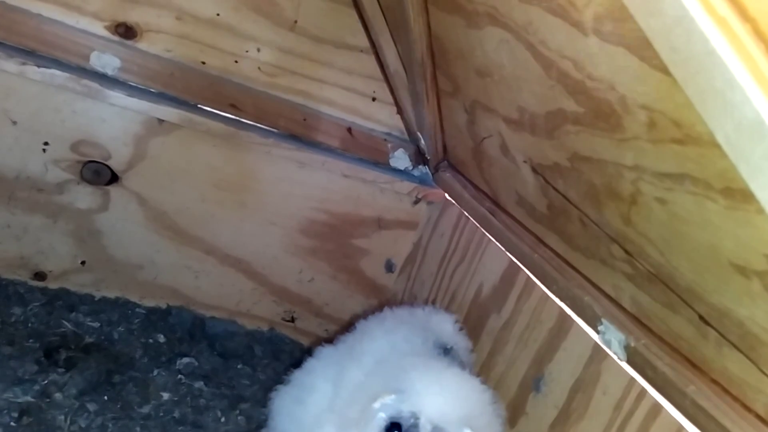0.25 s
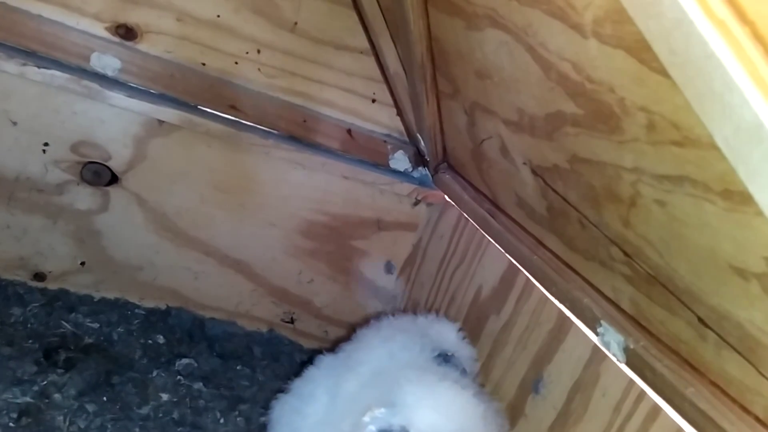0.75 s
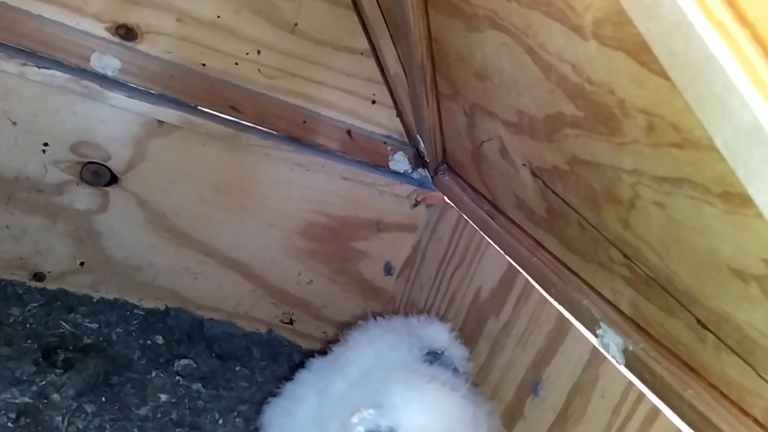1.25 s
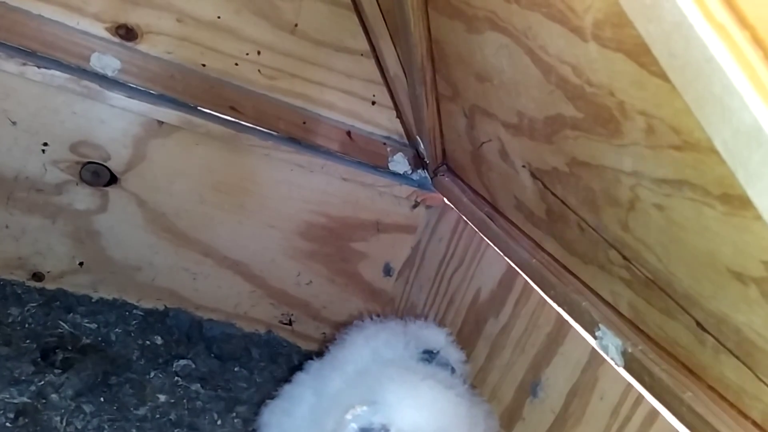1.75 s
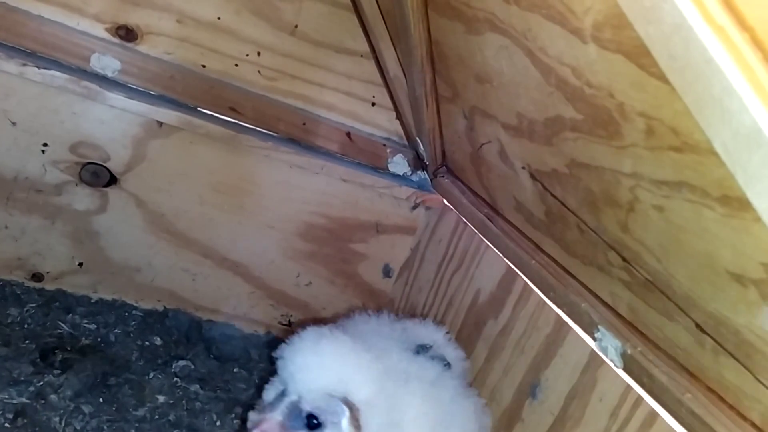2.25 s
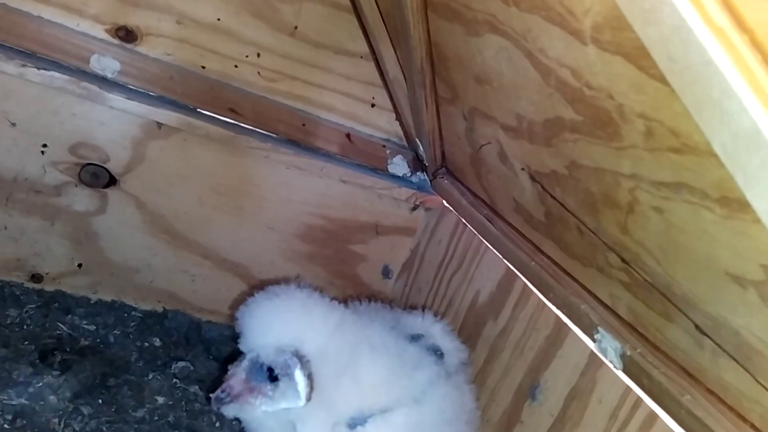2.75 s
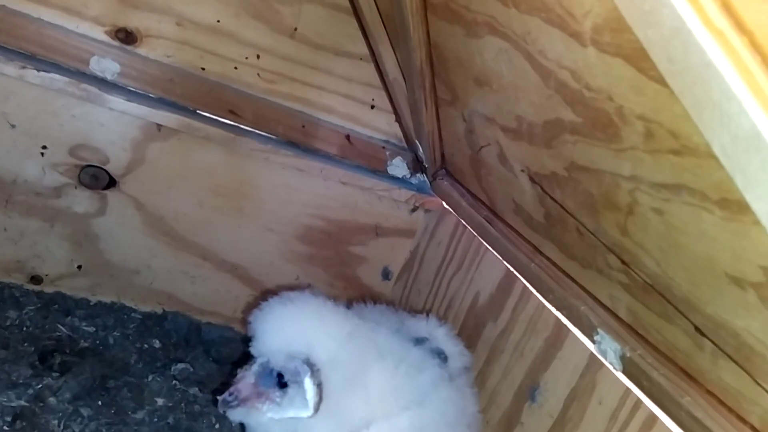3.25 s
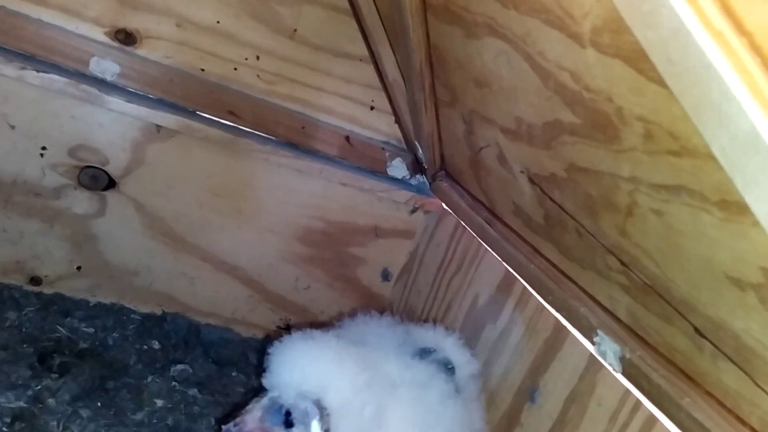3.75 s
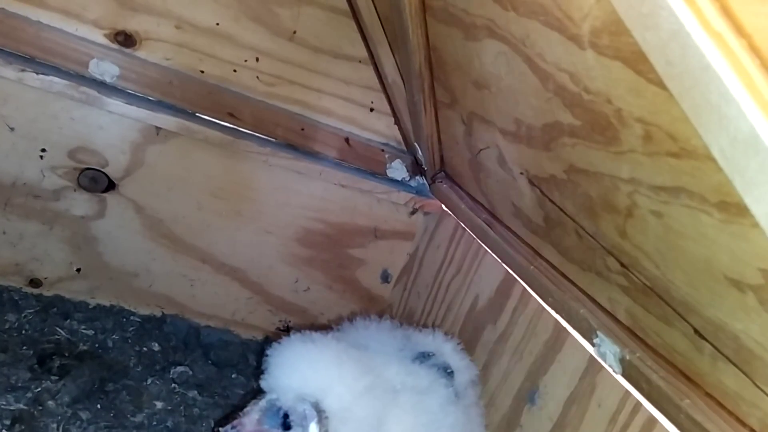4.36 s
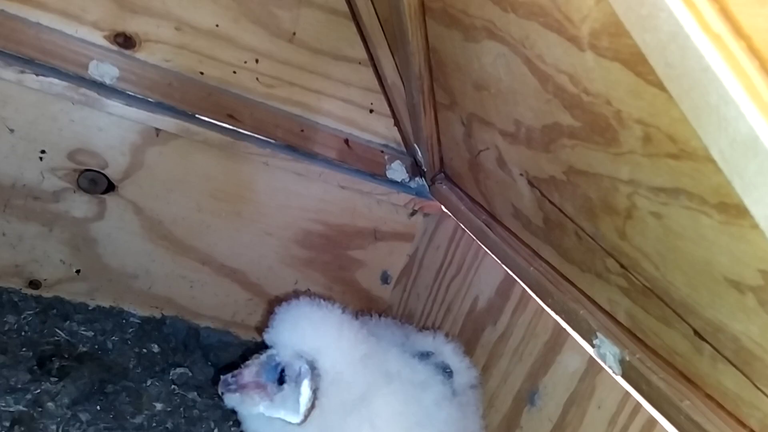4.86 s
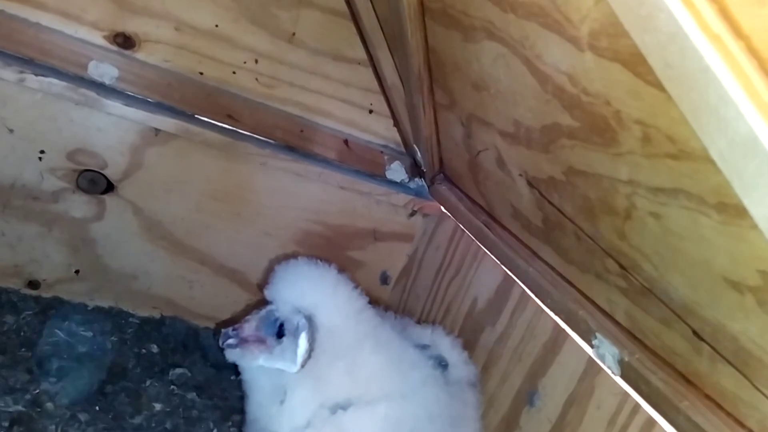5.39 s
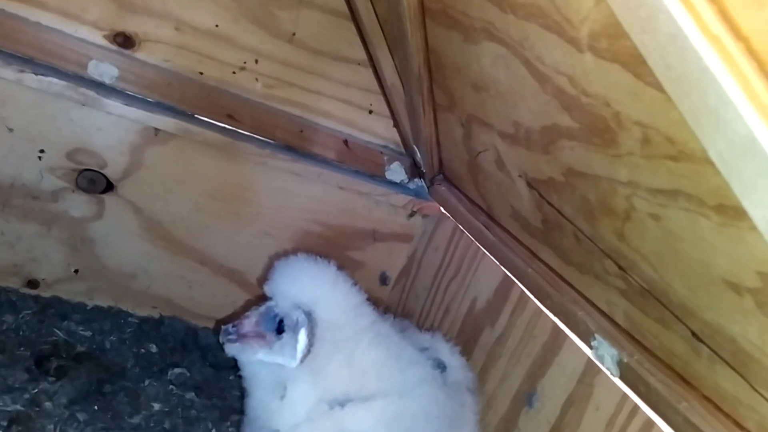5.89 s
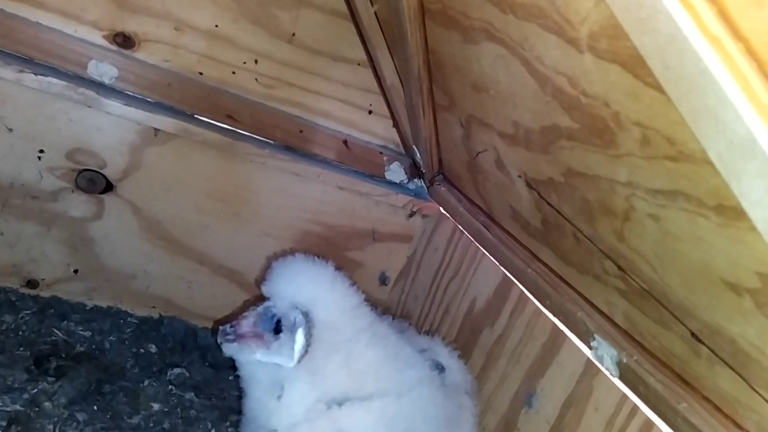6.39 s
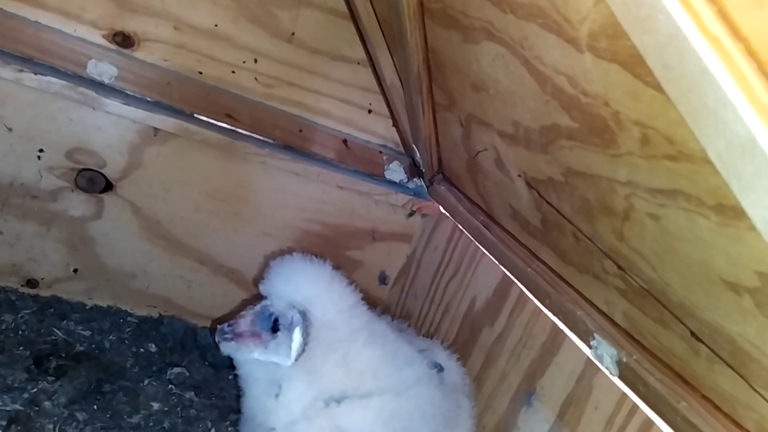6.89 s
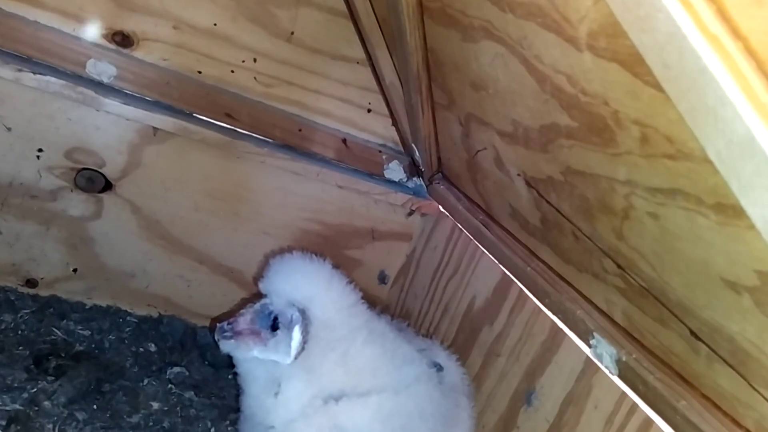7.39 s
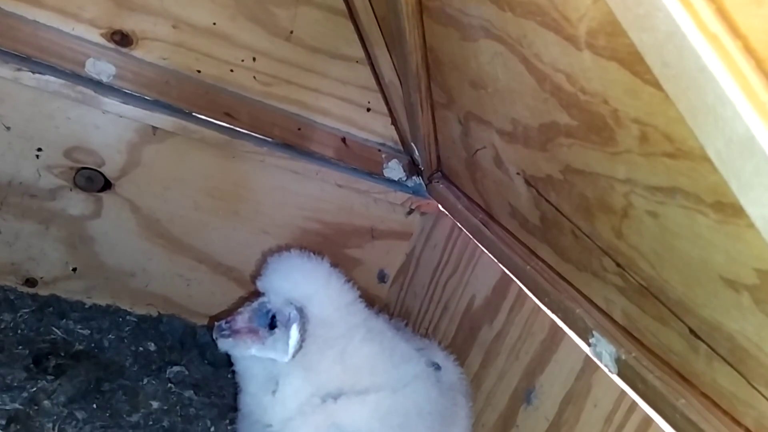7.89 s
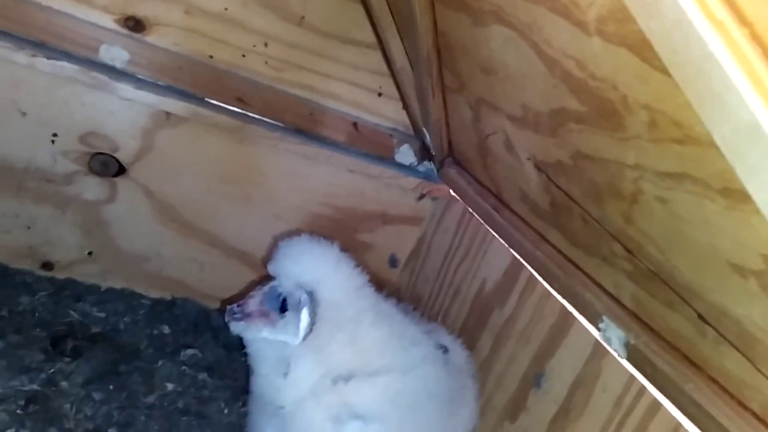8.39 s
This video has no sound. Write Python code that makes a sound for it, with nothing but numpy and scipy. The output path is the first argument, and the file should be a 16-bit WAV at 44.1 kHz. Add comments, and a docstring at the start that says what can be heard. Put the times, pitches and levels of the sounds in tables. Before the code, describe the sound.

Inside a plywood nest box, a downy barn owl chick shuffles and knocks the boards, then gives four quick rasping hisses with brief falling squeals. A hard thump follows, then four more hisses, another knock and two isolated hisses. Outside, paired pips, thin whistles and distant hoarse wails sound over low hum and a passing engine. The microphone is close, in a small resonant box.

```python
"""Rasping bird hisses, two runs of four and then two single ones: streaky breath with short falling squeals.
A barn owl chick shifts about in a plywood nest box: rubbing and sharp knocks set the boards ringing.
Outside, one bird wails in two hoarse tones, another pips in pairs and a third whistles thinly.
Behind them lie filtered noise for a low hum and air, a wavering engine tone and spells of a low drone.
"""
import sys
import numpy as np
from scipy import signal
from scipy.fft import rfft, irfft, next_fast_len
from scipy.io import wavfile
from scipy.ndimage import uniform_filter1d, minimum_filter1d

SR = 44100
rng = np.random.default_rng(int(sys.argv[2]) if len(sys.argv) > 2 else 0)


def generate_wav(sig):
    """Save sig (samples, or channels by samples) to the path in sys.argv[1] as 16-bit PCM at SR."""
    pcm = np.round(np.clip(np.atleast_2d(sig).T, -1, 1) * 32767).astype(np.int16)
    wavfile.write(sys.argv[1], SR, pcm)


N = 381024
T = np.arange(N) / SR


def amp(db):
    """Turns decibels into a plain multiplier."""
    return 10 ** (np.asarray(db) / 20)


def evened(x):
    """Scales a sound to rms 1."""
    return x / np.sqrt(np.mean(x ** 2) + 1e-20)


def noise(size):
    """Plain white noise."""
    return rng.standard_normal(size)


def follow(rows, t):
    """The columns of a curve, read at the times t."""
    s, *columns = np.transpose(rows)
    return [np.interp(t, s, column) for column in columns]


def add(mix, s, sound):
    """Lays a sound into the mix, starting at s seconds."""
    part = mix[max(round(s * SR), 0):][:len(sound)]
    part += sound[:len(part)]


def gate(t, length, attack, release):
    """Rises from silence, holds at 1 and falls back to silence at the end of its length."""
    return np.clip(t / attack, 0, 1) * np.clip((length - t) / release, 0, 1)


def peak_db(t, rise_db_per_s, fall_db_per_s):
    """A level that climbs to 0 dB at t = 0 and then falls."""
    return np.minimum(rise_db_per_s * t, -fall_db_per_s * t)


def coloured(points, size):
    """Noise of rms 1 with a given spectrum."""
    hz, db = np.transpose(points)
    log_hz = np.log(np.fft.rfftfreq(size, 1 / SR) + 1)
    gain = amp(np.interp(log_hz, np.log(hz), db))
    return evened(irfft(rfft(noise(size)) * gain, size))


def wander(rate_hz, size):
    """Smooth chance of about rms 1, with little movement faster than the given rate."""
    full = next_fast_len(size + SR // 2)
    gain = np.exp(-(np.fft.rfftfreq(full, 1 / SR) / rate_hz) ** 2)
    return evened(irfft(rfft(noise(full)) * gain, full))[:size]


def turning(hz):
    """The running phase of a tone whose pitch follows a curve."""
    return 2 * np.pi * np.cumsum(hz) / SR


def resonate(x, hz, width):
    """A steep resonance, three equal poles of the given width, that can follow a curve; rms 1."""
    turn = np.exp(1j * turning(hz * np.ones(len(x))))
    r = np.exp(-np.pi * width / SR)
    # turn the pitch down to zero, smooth there, and turn it back up
    smoothed = signal.lfilter([1], np.poly([r, r, r]), x / turn)
    return evened((turn * smoothed).real)


def glide(length, start_hz, end_hz, waver, hoarse=0):
    """A whistle that swells and fades as its pitch slides, from clean to hoarse; rms 1 at the top."""
    size, hoarse = int(length * SR), np.clip(hoarse, 0, 1)
    hz = np.geomspace(start_hz, end_hz, size) * (1 + waver * wander(300, size))
    clean = evened(np.sin(turning(hz)))
    fuzz = resonate(noise(size), hz, 450)
    return evened((1 - hoarse) * clean + hoarse * fuzz) * np.hanning(size)


def echoes(x, t60, low_hz, high_hz):
    """A diffuse tail of energy 1 within a band."""
    t = T[:SR // 2]
    band = signal.butter(2, [low_hz, min(high_hz, SR / 2.2)], "band", fs=SR, output="sos")
    tail = signal.sosfilt(band, noise(len(t))) * amp(-60 * t / t60) * (1 - np.exp(-t / 0.0043))
    return signal.oaconvolve(x, tail / np.linalg.norm(tail))[:N]


# resonances of the low hum: f/Hz, width/Hz, level/dB
HUM = [(65.6, 30, -47), (86.3, 16.8, -32), (124.64, 14.6, -34), (116, 106, -34), (189.6, 46, -46)]
# slow rise and fall of the hum: t/s, level/dB
HUM_LEVEL = [(0, -2.5), (1.1, 1.5), (2.7, 1.5), (3.8, -1), (4.7, 1.5), (6.3, 3), (6.8, 1.5), (8.3, 3.5),
             (8.64, -0.5)]


def low_hum():
    """Noise gathered by a few low resonances, with its level drifting."""
    hum = sum(amp(db) * resonate(noise(N), hz, width) for hz, width, db in HUM)
    hum = signal.sosfilt(signal.butter(6, 50, "high", fs=SR, output="sos"), hum)
    return amp(follow(HUM_LEVEL, T)[0] + 1.1 * wander(6.9, N)) * hum


# colour of the outdoor air: f/Hz, relative level/dB (per Hz)
AIR = [(120, -31), (200, -1.5), (313, -1.5), (539, -5), (629, -5.5), (735, -4.5), (2070, -17.5),
       (3400, -14), (4100, -18), (4500, -17.5), (5250, -21.5), (6800, -28.5), (7700, -41), (10500, -81.5),
       (17800, -120)]
# level of the outdoor air: t/s, level/dB
AIR_LEVEL = [(0, -51), (.5, -51), (3.3, -51), (5.8, -47), (6.7, -50.5), (8.3, -47.5), (8.64, -51)]


def outdoor_air():
    """Coloured noise that flickers slightly in level."""
    air = coloured(AIR, N) * amp(1.4 * wander(34, N))
    return amp(follow(AIR_LEVEL, T)[0]) * air


ENGINE_NEAREST_S, ENGINE_DB, ENGINE_RISE_DB_PER_S, ENGINE_FALL_DB_PER_S = 2.045, -23.5, 7, 10.5
ENGINE_START_HZ, ENGINE_CLIMB_HZ_PER_S = 145.1, 2.5


def distant_engine():
    """A wavering tone comes nearer and goes away, slowly gaining speed and so climbing in pitch."""
    db = ENGINE_DB + peak_db(T - ENGINE_NEAREST_S, ENGINE_RISE_DB_PER_S, ENGINE_FALL_DB_PER_S)
    hz = ENGINE_START_HZ + ENGINE_CLIMB_HZ_PER_S * T
    tone = evened(np.sin(turning(hz * (1 + 0.013 * wander(12, N)))))
    return amp(db + 2 * wander(21, N)) * tone


# spells of the drone: start t/s, length/s, level/dB at the start
DRONES = [(0.071, 0.37, -37), (0.8, 0.56, -39.5), (1.41, 1.6, -43.5), (5.297, 0.93, -28)]
DRONE_ATTACK_S, DRONE_RELEASE_S, DRONE_SAG_DB_PER_S = 0.049, 0.077, 6
DRONE_TONE_HZ, DRONE_TONE_DB = 253.7, -7.5  # one steady tone; its level is against the noise


def low_drone():
    """Two bands of noise and one steady tone come and go, each spell slowly sagging in level."""
    drone = evened(resonate(noise(N), 245.6, 76) + 0.66 * resonate(noise(N), 311, 85))
    tone = evened(np.sin(2 * np.pi * DRONE_TONE_HZ * T))
    drone = evened(drone + amp(DRONE_TONE_DB) * tone)
    spells = np.zeros(N)
    for s, length, db in DRONES:
        level = amp(db - DRONE_SAG_DB_PER_S * (T - s))
        spells += level * gate(T - s, length, DRONE_ATTACK_S, DRONE_RELEASE_S)
    return spells * drone


def background():
    """Hum, air, engine and drone together."""
    return low_hum() + outdoor_air() + distant_engine() + low_drone()


# the thin whistles: start t/s, length/s, start f/Hz, end f/Hz, level/dB, hoarseness (0-1)
WHISTLES = [(0.345, 0.073, 5200, 5050, -61, .6), (1.386, 0.033, 1670, 1800, -48.5, 0.04),
            (7.996, 0.068, 5090, 5000, -58, 0.75), (0.432, 0.061, 4540, 4800, -50, 0.2),
            (0.478, 0.04, 3070, 3580, -39, 0.4), (1.561, 0.13, 5180, 4760, -50.5, 0.5),
            (2.988, 0.22, 4800, 5240, -57, 1), (3.244, 0.14, 5500, 5430, -58, 0.6),
            (3.322, 0.16, 5080, 4970, -54, 0.4), (3.333, 0.083, 4780, 4570, -46.5, 0.4),
            (5.043, 0.16, 7730, 7730, -55, 0.16), (5.335, 0.12, 5070, 4920, -45, 0.8),
            (5.343, 0.17, 4500, 4200, -43.5, .9), (5.755, 0.26, 7130, 7820, -54.5, 0.4),
            (6.188, 0.14, 7000, 6870, -57, 0.7), (6.95, 0.043, 2870, 4000, -40.5, 0.4),
            (6.977, 0.054, 3600, 3800, -44.5, 1), (7.518, 0.11, 6800, 7320, -52.5, 0.65),
            (7.736, 0.11, 5200, 5030, -50.5, .7), (7.794, 0.061, 4220, 3790, -38.5, 0.37),
            (8.311, 0.18, 4700, 4310, -38.5, 0.8), (8.36, 0.092, 4930, 3220, -37, 0.4)]


def whistles():
    """Thin gliding tones, some clean and some breathy."""
    out = np.zeros(N)
    for s, length, start_hz, end_hz, db, hoarse in WHISTLES:
        add(out, s, amp(db) * glide(length, start_hz, end_hz, waver=0.0081, hoarse=hoarse))
    return out


# pairs of falling pips: middle of the second pip t/s, level/dB
PIP_PAIRS = [(0.127, -37.5), (0.357, -35), (0.663, -34.5), (0.805, -36.5), (1.028, -33), (1.283, -36),
             (1.5, -37), (1.659, -33.5), (3.543, -40), (3.72, -39), (3.916, -38), (5.855, -43),
             (6.041, -36.5), (6.243, -35), (6.457, -35.5), (7.625, -42.5), (7.979, -34), (8.197, -37.5),
             (8.478, -38)]
# a faint lead-in note, a softer pip and the full pip: t/s from the second pip, level/dB against the pair
PIP_RUN = [(-.08, -25), (-.042, -5.5), (0, 1)]
PIP_ECHO_S, PIP_ECHO_DB = .026, -17
PIP_LENGTH_S, PIP_START_HZ, PIP_END_HZ = .028, 4306, 3924  # each pip strays a little from these


def pips():
    """Short falling whistles in pairs, each with one quick echo."""
    out = np.zeros(N)
    for second, db in PIP_PAIRS:
        for offset, pip_db in PIP_RUN:
            stretch, detune, slip, size_db = rng.standard_normal(4)
            length = PIP_LENGTH_S * 2 ** (.2 * stretch)
            pitch = 1 + .008 * detune
            end_hz = pitch * PIP_END_HZ * (1 + .018 * slip)
            pip = glide(length, pitch * PIP_START_HZ, end_hz, waver=0.0047, hoarse=0.098)
            pip = amp(db + pip_db + size_db) * pip
            onset = second + offset - length / 2
            add(out, onset, pip)
            add(out, onset + PIP_ECHO_S, amp(PIP_ECHO_DB) * pip)
    return out


def songbirds():
    """Paired pips and thin whistles, with a diffuse echo from the trees."""
    out = pips() + whistles()
    return out + amp(-19) * echoes(out, 0.39, 3000, 6800)


# hoarseness of a wail: width of the noise around each tone, and its strength on the lower and upper one
WAIL_FUZZ_HZ, WAIL_LOW_FUZZ, WAIL_HIGH_FUZZ = 230, .52, .75


def hoarse_tone(hz, fuzz):
    """A nearly steady tone wrapped in a narrow band of breath; rms 1."""
    tone = evened(np.sin(turning(hz * (1 + .007 * wander(250, len(hz))))))
    return evened(tone + fuzz * resonate(noise(len(hz)), hz, WAIL_FUZZ_HZ))


# distant wails: start t/s, length/s, level/dB
WAILS = [(3.278, 0.41, -33.5), (3.886, 0.51, -36.5), (4.491, 0.53, -36), (5.125, 0.45, -34),
         (5.747, 0.43, -33)]
# overtones, strongest while a wail is at its top: f/Hz, width/Hz, level/dB against the lower tone
WAIL_OVERTONES = [(2926, 110, -12.5), (3420, 86, -10.5)]
# a wail scoops up to its top and sinks back; attack and release are shares of its length
WAIL_TOP_S, WAIL_SCOOP_S, WAIL_SINK_S, WAIL_ATTACK, WAIL_RELEASE = .062, 0.055, 0.1, 0.048, 0.23
# resting pitch of each tone, and its usual lift at the top
WAIL_LOW_HZ, WAIL_LOW_LIFT_HZ, WAIL_HIGH_HZ, WAIL_HIGH_LIFT_HZ = 1354, 345, 2030, 210
WAIL_START_DB, WAIL_FULL = -12, 0.43  # it starts soft and is full at this share of its length
# how long overtones and upper tone last on each side of the top, and the level of that tone there
WAIL_OVERTONE_S, WAIL_HIGH_S, WAIL_HIGH_DB = .04, 0.096, -4
WAIL_THROB_HZ, WAIL_THROB = 62, .85  # average rate, and depth before the top weakens it


def wail(length, db):
    """A cry of two tones, with brief overtones at its top; its throb deepens as it sinks."""
    size = int(length * SR)
    share, t = np.linspace(0, 1, size), T[:size] - WAIL_TOP_S
    arch = np.exp(-(abs(t) / np.where(t < 0, WAIL_SCOOP_S, WAIL_SINK_S)) ** 1.7)
    arch = arch * (1 + .08 * rng.standard_normal()) + .035 * wander(20, size)
    low_hz = WAIL_LOW_HZ + WAIL_LOW_LIFT_HZ * arch
    high_hz = WAIL_HIGH_HZ + WAIL_HIGH_LIFT_HZ * arch
    soft_start = amp(WAIL_START_DB * np.maximum(1 - share / WAIL_FULL, 0))
    swell = gate(share, 0.88, WAIL_ATTACK, WAIL_RELEASE) * soft_start
    beat = turning(WAIL_THROB_HZ * (1 + .12 * wander(40, size)))
    throb = WAIL_THROB * (1 - arch / 2)
    # the throb sways the lower pitch as well as the loudness
    low = hoarse_tone(low_hz + throb * WAIL_THROB_HZ * np.cos(beat), WAIL_LOW_FUZZ)
    high_level = amp(WAIL_HIGH_DB) * np.exp(-(t / WAIL_HIGH_S) ** 2) + amp(-24.5)
    high = hoarse_tone(high_hz, WAIL_HIGH_FUZZ) * high_level
    overtones = sum(amp(over_db) * resonate(noise(size), hz, width) for hz, width, over_db in WAIL_OVERTONES)
    cry = low + high + np.exp(-(t / WAIL_OVERTONE_S) ** 2) * overtones
    return amp(db) * swell * evened((1 + throb * np.sin(beat) / 2) * cry)


def wails():
    """Every distant wail, with a faint diffuse echo."""
    out = np.zeros(N)
    for s, length, db in WAILS:
        add(out, s, wail(length, db))
    return out + amp(-12) * echoes(out, .2, 900, 4000)


# ways the box likes to ring (its modes): f/Hz, relative level/dB, t60/s (time to fall by 60 dB)
BOARDS = [(204.8, 4, 0.5), (240, -10.5, 1), (296, -3.5, 0.41), (368.5, 1.5, .25), (404.3, 0.5, 0.23),
          (490.6, 3.5, 0.16), (587, -6.5, 0.28), (658, -2, 0.24), (719, -3, 0.15), (795, 0, 0.16),
          (852.4, 3.5, 0.17), (904, -6, 0.27), (958, -1, 0.13), (1033, -4.5, 0.22), (1107, -8.5, .12),
          (1195, -9, 0.19), (1257, -12, 0.13)]
# the chick shuffles on the boards: start t/s, length/s, level/dB
SHUFFLES = [(0.12, 0.044, -53), (0.258, 0.07, -42.5), (0.336, 0.046, -45), (0.441, 0.088, -44.5),
            (0.615, 0.16, -36), (0.801, 0.18, -44.5), (1.015, 0.4, -50), (1.26, 0.063, -48.5),
            (3.414, 0.095, -44)]
RUB_HZ, RUB_FOCUS_DB = 684, 8.5  # the pitch that rubbing favours, and the loss an octave away


def shuffles():
    """Soft rubbing stirs the modes of the box, heard as narrow bands of noise."""
    out = np.zeros(N)
    for s, length, db in SHUFFLES:
        size = int(length * SR)
        rub = np.zeros(size)
        for hz, mode_db, _ in BOARDS:
            weight = amp(mode_db - RUB_FOCUS_DB * np.log2(hz / RUB_HZ) ** 2)
            rub += weight * resonate(noise(size), hz, 110)
        add(out, s, amp(db + 3.7 * wander(55, size)) * evened(rub) * np.hanning(size))
    return out


STRIKE_SPREAD_DB = 2  # each blow lands on another spot and so weights the modes differently


def board_ring(t, favoured_hz, focus_db):
    """The modes of the box die away together, strongest near the pitch the blow favours."""
    hz, db, t60 = np.transpose(BOARDS)[:, :, None]
    spread_db = STRIKE_SPREAD_DB * rng.standard_normal(hz.shape)
    weight = amp(db - focus_db * np.log2(hz / favoured_hz) ** 2 + spread_db)
    phase = 2 * np.pi * rng.random(hz.shape)
    hz = hz * (1 + .008 * rng.standard_normal(hz.shape))
    modes = weight * amp(-60 * t / t60) * np.sin(2 * np.pi * hz * t + phase)
    ring = modes.sum(0) / np.linalg.norm(weight)
    # countless weaker modes fill in between the strong ones
    wash = resonate(noise(len(t)), favoured_hz, 1.5 * favoured_hz)
    boards = np.sqrt(2) * ring + wash * (amp(-8 - 60 * t / .11) + amp(-22 - 60 * t / .5))
    return boards * (1 - np.exp(-t / .0012))  # the boards take a moment to answer


# colour of the crack: f/Hz, relative level/dB
CRACK = [(300, -13), (900, -2), (1300, -10.5), (2700, -6.5), (3400, -13), (4000, -16), (6000, -21.5),
         (8000, -44.5)]


def wood_crack(t, crack_hz, top_hz, t60, rise):
    """A short tick, a snap of noise around it and a broader crack, with the treble cut off."""
    tick = amp(5) * np.sin(2 * np.pi * crack_hz * t) * amp(-60 * t / 0.015)
    snap = tick + amp(-8.5) * resonate(noise(len(t)), crack_hz, 1300) * amp(-60 * t / t60)
    hardness = (0.0012 / max(rise, .001)) ** .5  # a slow contact makes less of the broad crack
    fading = amp(-5.5 - 60 * t / t60) + amp(-19 - 60 * t / 0.15) + amp(-28.5 - 60 * t / 0.45)
    crack = snap + hardness * coloured(CRACK, len(t)) * fading
    return signal.sosfilt(signal.butter(3, min(top_hz, SR / 2.2), fs=SR, output="sos"), crack)


def floor_thump(t, thump_hz):
    """The floor shakes with a low tone and a band of low noise."""
    floor = np.sin(2 * np.pi * thump_hz * t) + 0.44 * resonate(noise(len(t)), 150, 220)
    return floor * amp(-60 * t / 0.38) * (1 - np.exp(-t / 0.004))


def knock(board_db, favoured_hz, focus_db, crack_db, crack_hz, top_hz, crack_t60, thump_db, thump_hz, rise):
    """A blow cracks, rings the boards and shakes the floor, all softened by how slowly it makes contact."""
    t = T[:SR // 2]
    boards = amp(board_db) * board_ring(t, favoured_hz, focus_db)
    crack = amp(crack_db) * wood_crack(t, crack_hz, top_hz, crack_t60, rise)
    thump = 2 * amp(thump_db) * floor_thump(t, thump_hz)
    contact = 1 - np.exp(-(t / rise) ** 2)
    return contact * (boards + crack + thump)


# knocks on the box: t/s, board level/dB, favoured f/Hz, loss an octave from it/dB, crack level/dB,
# crack centre f/Hz, crack top f/Hz, crack t60/s, thump relative level/dB, thump f/Hz, rise/s
KNOCKS = [(0.503, -21, 660, 15, -13, 2920, 3700, 0.066, -50, 73, 0.003),
          (0.5074, -10, 700, 6, -5.5, 2614, 3800, 0.019, -49, 72.5, 0.00034),
          (0.574, -21, 596, 8, -27, 2700, 6000, 0.072, -39, 87.5, 0.003),
          (.593, -9.5, 806, 18, -18, 1730, 6900, 0.028, -19.5, 85, 0.0003),
          (0.5983, -14.5, 688, 26, -17, 2630, 6500, 0.036, -35, 90, 0.00067),
          (.621, -32, 800, 8, -44, 1980, 4000, 0.042, -37, 87.6, .002),
          (1.389, -27, 500, 33, -54, 1730, 1980, 0.056, -29, 75, 0.005),
          (1.401, -14.5, 348, 47.5, -55, 1730, 1980, 0.056, -12.5, 75.3, 0.0028),
          (1.453, -32, 480, 19, -61, 1700, 2000, .05, -26.5, 72, 0.011),
          (1.6989, -6.5, 593, 7.5, -8.5, 1710, 6800, 0.047, -40, 72, 0.001),
          (1.715, -11, 800, 12, -24, 1900, 6000, 0.031, -48, 72, 0.0013),
          (2.263, -44.5, 780, 30, -26, 1720, 6600, 0.22, -54, 72, 0.0025),
          (3.0102, -5, 463, 62, -20, 3000, 3700, 0.2, -16.5, 92.8, 0.0019),
          (3.02, -16, 770, 31, -30, 1490, 3680, .1, -27, 70, 0.0023),
          (3.082, -29, 600, 9, -50.5, 2200, 3500, 0.13, -28, 84, 0.0035),
          (6.055, -8.5, 740, 9.5, -7, 1850, 5500, 0.038, -48.5, 71.8, 0.00033),
          (6.078, -15.5, 736, 26, -33.5, 1490, 2980, 0.049, -51, 72.3, .002),
          (8.383, -30, 660, 14, -36.5, 1700, 2520, 0.13, -66, 72, 0.0077)]


def knocks():
    """Every blow on the same box."""
    out = np.zeros(N)
    for s, *blow in KNOCKS:
        add(out, s, knock(*blow))
    return out


# bands of the echo that lingers after a hiss: f/Hz, width/Hz, relative level/dB
AFTERRING = [(3275, 170, 2), (3720, 880, 1.5)]
AFTERRING_DELAY_S, AFTERRING_LENGTH_S, AFTERRING_FADE_DB_PER_S = 0.08, 0.18, 24


def afterring(db):
    """A thin fading echo of the squeal, two bands of noise, lingers after a hiss."""
    t = T[:int(AFTERRING_LENGTH_S * SR)]
    bands = sum(amp(band_db) * resonate(noise(len(t)), hz, width) for hz, width, band_db in AFTERRING)
    fade = amp(db - AFTERRING_FADE_DB_PER_S * t)
    return fade * gate(t, AFTERRING_LENGTH_S, 0.021, 0.061) * evened(bands)


def streaks(hz, size, per_s, octaves):
    """The voice slips down in pitch and jumps back, unevenly, many times a second; rms 1."""
    cycle = np.cumsum(per_s * (1 + 0.33 * wander(70, size))) / SR + rng.random()
    slip = cycle % 1
    pitch = hz * 2 ** (octaves * (.5 - slip)) * (1 + 0.0353 * wander(587, size))
    return evened(np.sin(turning(pitch)) * np.sin(np.pi * slip) * amp(3.5 * wander(110, size)))


# upper throat resonances: f/Hz, width/Hz, level/dB, t/s from the main squeal at which each joins in
THROAT = [(2445, 700, -8.5, .016), (3106, 770, -2, -0.053), (3697, 850, 2.5, -0.11), (4360, 600, -6, -0.11),
          (5060, 1500, -11, -.04), (5680, 380, -13, -0.081), (6690, 2000, -19.5, -0.071)]
# the lowest resonance sinks, lifts at the main squeal and sinks again:
# t/s from the main squeal, f/Hz, level/dB
LOW_THROAT = [(-.07, 2700, 0.5), (-.04, 2050, -6.5), (-.018, 2320, -5.5), (0, 2650, -3), (.022, 1908, -8.5),
              (.05, 1750, -6.5), (.075, 1728, -8.5), (.11, 1940, -12)]
RASP_PER_S = 110  # average number of falling streaks a second
RASP_OCTAVES = .38  # fall of a streak in a resonance 900 Hz wide at 3000 Hz
RASP_BREATH = .85  # plain breath against the streaks, at 4000 Hz
TREBLE_HZ = 5000  # the treble setting acts above about here


def throat_breath(t, lead, depth_db, treble_db):
    """Falling streaks and plain turbulence sound in each throat resonance; rms 1."""
    breath = np.zeros(len(t))
    low_hz, low_db = follow(LOW_THROAT, t)
    for hz, width, db, joins_s in THROAT + [(low_hz, 850, low_db + depth_db, -lead)]:
        centre = np.mean(hz)
        hz = hz * (1 + .02 * wander(40, len(t)))
        octaves = RASP_OCTAVES * width / 900 * (3000 / centre) ** .7
        rasp = streaks(hz, len(t), RASP_PER_S, octaves)
        turbulence = RASP_BREATH * centre / 4000 * resonate(noise(len(t)), hz, width)  # airier higher up
        treble = 1 / (1 + (TREBLE_HZ / centre) ** 10)
        joining = np.clip((t - joins_s) / 0.013, 0, 1)
        breath += amp(db + treble * treble_db) * joining * evened(rasp + turbulence)
    return evened(breath)


# lesser squeals around the main one in every hiss, each straying a little:
# middle t/s from the main squeal, length/s, start f/Hz, end f/Hz, relative level/dB
SQUEALS = [(-.037, .013, 3880, 3250, -7), (-.026, .017, 3954, 3430, -2.5), (-.011, .016, 4084, 3350, -3.5),
           (.015, .015, 4000, 3500, -4), (0.04, .016, 4080, 3710, -8)]
# a second, lower voice slides beneath them, with the same columns
UNDERTONES = [(-.017, 0.019, 3368, 2252, -8), (.001, .022, 2840, 2594, -5)]
MAIN_SQUEAL_S = 0.02


def squeal_voice(size, lead, squeal_db, main_db, main_hz, fall, under_db):
    """Short falling whistles, and a curve of how firmly the voice locks on them."""
    squeals, held = np.zeros((2, size))
    main = [(0.0011, MAIN_SQUEAL_S, main_hz, main_hz / 2 ** fall, 0.016)]
    for voice_db, slides in (squeal_db, SQUEALS), (under_db, UNDERTONES), (main_db, main):
        for s, length, start_hz, end_hz, db in slides:
            slip, size_db, detune = rng.standard_normal(3)
            onset = s + lead - length / 2 + .001 * slip
            pitch = 1 + .012 * detune
            squeal = glide(length, pitch * start_hz, pitch * end_hz, waver=.012)
            add(squeals, onset, amp(voice_db + db + size_db) * squeal)
            add(held, onset, amp(db) * np.hanning(len(squeal)))
    return squeals, held


# a hiss snaps open, swells up to its main squeal, holds, fades and closes
HISS_ATTACK_S, HISS_TAIL_S, HISS_RELEASE_S = 0.019, 0.17, 0.055
HISS_SWELL_DB_PER_S, HISS_FADE_DB_PER_S, HISS_HOLD_S = 116, 195, 0.023
CATCH_S, CATCH_WIDTH_S, CATCH_DB = 0.019, 0.011, -4  # the rasp catches just after the main squeal


def hiss(lead, breath_db, depth_db, treble_db, *voice):
    """Fluttering breath through the throat; at the height of the effort it breaks into squeals."""
    t = T[:SR // 4] - lead  # time from the main squeal
    swell_db = np.minimum(HISS_SWELL_DB_PER_S * t, 0)
    fade_db = HISS_FADE_DB_PER_S * np.maximum(t - HISS_HOLD_S, 0)
    catch_db = CATCH_DB * np.exp(-((t - CATCH_S) / CATCH_WIDTH_S) ** 2)
    effort_db = swell_db - fade_db + catch_db
    beak = gate(t + lead, lead + HISS_TAIL_S, HISS_ATTACK_S, HISS_RELEASE_S)
    breath = throat_breath(t, lead, depth_db, treble_db)
    squeals, held = squeal_voice(len(t), lead, *voice)
    flutter_db = 1.4 * wander(110, len(t))
    # while the voice locks on a squeal, the rasp gives way
    return squeals + beak * amp(breath_db + effort_db + flutter_db - 2 * held) * breath


# hisses: main squeal t/s, lead-in/s, breath level/dB, extra level of the lowest resonance/dB,
# extra level of the treble/dB, lesser squeals level/dB, main squeal level/dB, main squeal f/Hz,
# its fall/octaves, undertone level/dB, echo level/dB
HISSES = [(1.814, 0.075, -23.5, 1, -1.5, -20, -13.5, 3360, 0.039, -25.5, -37.5),
          (2.078, 0.082, -23.5, 0.5, 1, -14.5, -12, 3266, 0.031, -20.5, -41),
          (2.337, 0.093, -24, 1, 1, -18, -13, 3320, 0.024, -20.5, -43),
          (2.6, 0.085, -24.5, 0, 0.5, -15.5, -13.5, 3300, 0.073, -22, -44),
          (4.445, 0.075, -21.5, -0.5, 0, -17, -19, 3340, 0.24, -16.5, -40),
          (4.712, 0.077, -21.5, 1.5, 0, -12, -17, 3450, 0.16, -16, -41.5),
          (4.975, .072, -22, -1, -3, -16, -21.5, 3470, 0.26, -18.5, -40),
          (5.238, 0.089, -22, 3, -3.5, -14, -26, 3400, 0.29, -18.5, -39),
          (7.088, 0.075, -22, 2.5, 5, -23, -20, 3380, 0.28, -14.5, -57),
          (8.593, 0.08, -23.5, 3.5, 5, -24, -30, 3370, 0.19, -18.5, -52)]


def hisses():
    """All the hisses and their lingering echoes, with the quick ring of the box and a faint longer echo."""
    out = np.zeros(N)
    for s, lead, *call, echo_db in HISSES:
        add(out, s - lead, hiss(lead, *call))
        add(out, s + AFTERRING_DELAY_S, afterring(echo_db))
    ring = amp(-15) * echoes(out, .07, 900, 8000)
    return out + ring + amp(-19) * echoes(out, 0.31, 1900, 4700)


# the whole sound drops away briefly: middle t/s, half width/s
DIPS = [(0.428, 0.016), (.795, 0.022), (3.205, 0.012), (2.771, 0.028), (3.859, 0.034), (4.28, 0.043),
        (6.918, 0.084), (7.368, 0.076), (7.621, 0.12)]
DIP_DB = -7.5


def scene():
    """All sources together; now and then the level dips briefly."""
    dip_db = DIP_DB * sum(np.exp(-((T - s) / width) ** 2) for s, width in DIPS)
    mix = background() + songbirds() + wails() + shuffles() + knocks() + hisses()
    return (amp(dip_db) * mix)[None]


CEILING, EDGE_HZ = .98, 8150  # limiter ceiling (full scale is 1), and top of the band


def record(dry):
    """The microphone loses the deepest bass, a quick limiter holds the loudest peaks; then the band limit."""
    dry = signal.sosfilt(signal.butter(4, 42, "high", fs=SR, output="sos"), dry)
    allowed = CEILING / np.maximum(abs(dry), CEILING)
    gain = uniform_filter1d(minimum_filter1d(allowed, size=129), size=129)
    band_limit = signal.firwin(255, EDGE_HZ, window=("kaiser", 8), fs=SR)[None]
    return signal.oaconvolve(gain * dry, band_limit, "same")


dry = scene()
out = record(dry)
generate_wav(out)
```